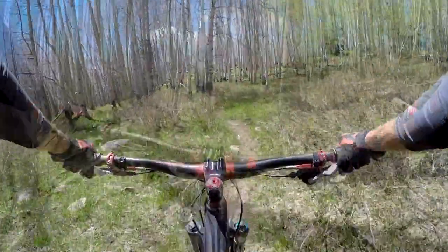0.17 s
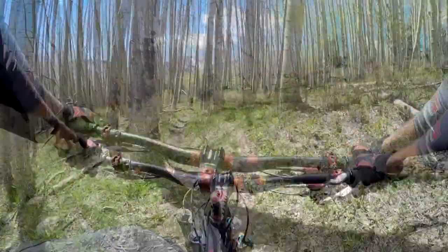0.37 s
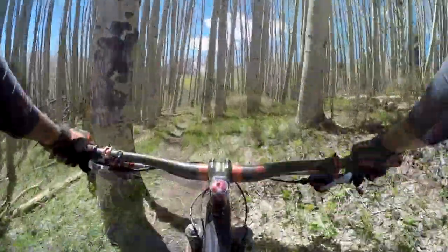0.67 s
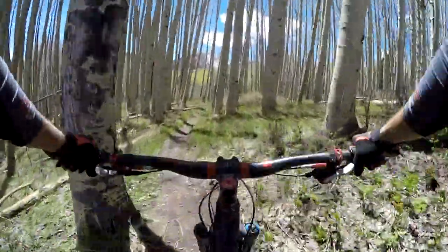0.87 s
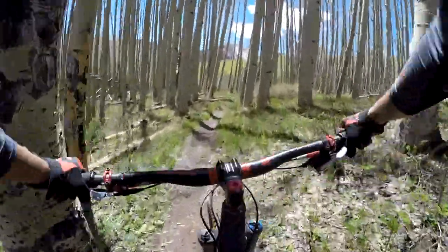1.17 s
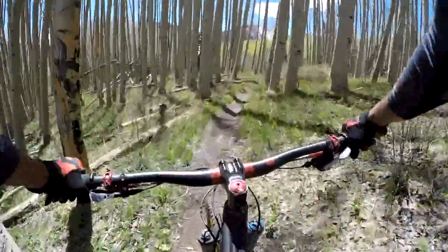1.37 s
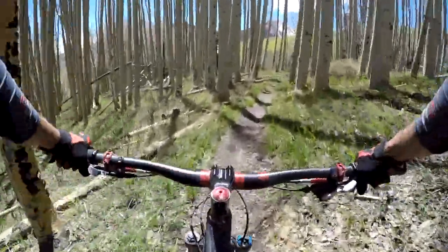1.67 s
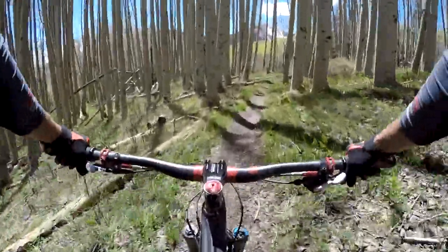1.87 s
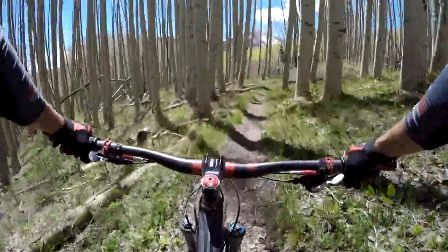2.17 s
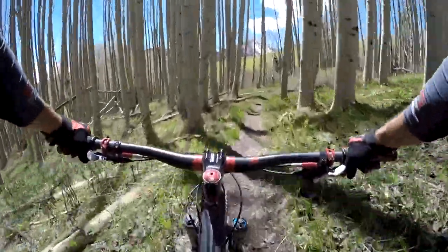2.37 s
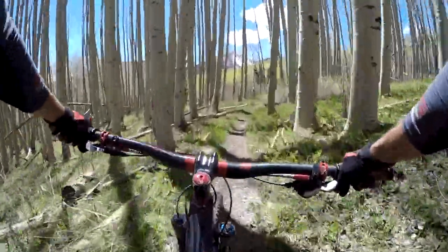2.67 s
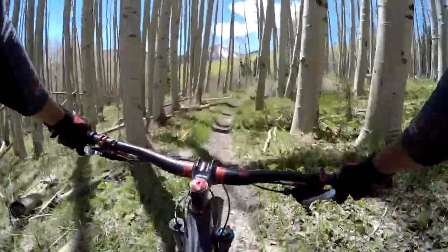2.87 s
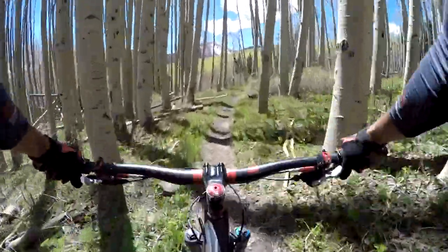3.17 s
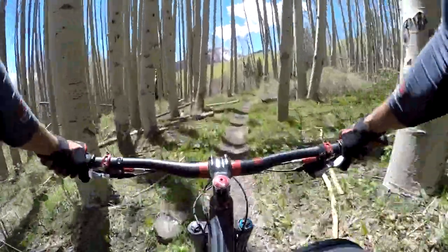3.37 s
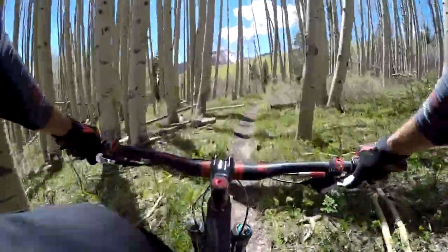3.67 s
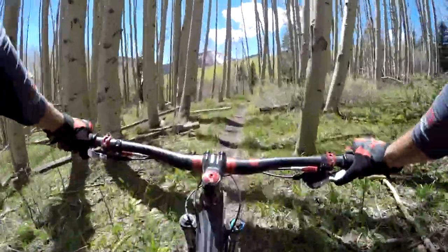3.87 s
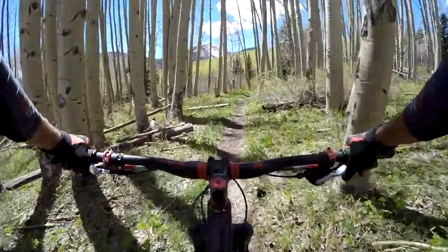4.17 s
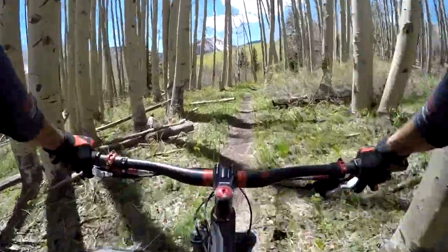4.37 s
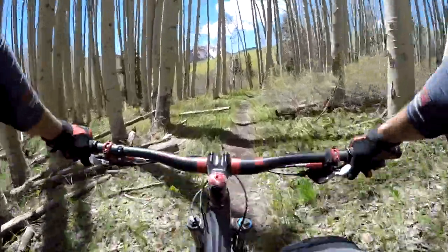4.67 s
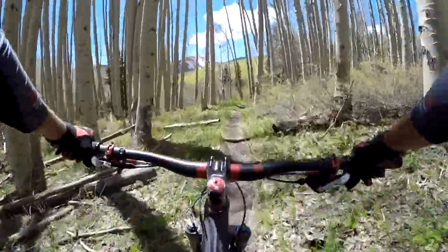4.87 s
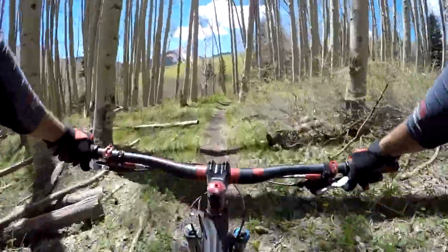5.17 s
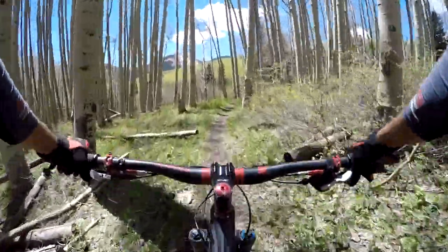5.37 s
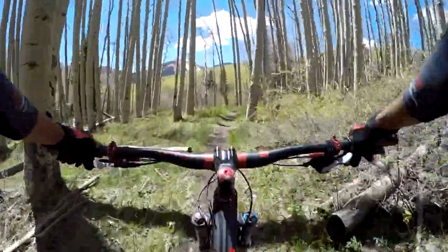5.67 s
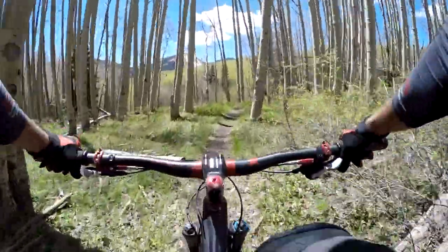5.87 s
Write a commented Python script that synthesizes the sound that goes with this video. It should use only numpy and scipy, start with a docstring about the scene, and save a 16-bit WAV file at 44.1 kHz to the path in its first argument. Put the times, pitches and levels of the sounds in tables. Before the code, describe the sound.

Close, chest-mounted microphone on a woodland bike ride. Constant deep wind buffets thump and flutter irregularly, far louder than the soft gritty crunch of tyres on dirt. Short dry clicks and rattles come in clusters, thickest just after one second and again near five, with one sharp tick around 3.6 seconds. A dull heartbeat thumps about three times a second beneath, almost hidden in the wind.

```python
"""On a dirt trail through woods, a camera strapped to a mountain biker's chest hears the ride.
Wind buffets its microphone: deep swinging thuds over filtered noise for rumble and eddies.
The heart thumps through the strap as damped swings, each with a snap of resonant noise.
Tyres crunch and scrape as grainy noise, and loose parts click as short, rough decaying tones.
Knocks and one pop stand out; the crunch and clicks are coloured by the camera's closed housing."""
import sys
import numpy as np
from scipy import signal
from scipy.fft import rfft, irfft, next_fast_len
from scipy.io import wavfile
from scipy.ndimage import uniform_filter1d

SR = 44100
rng = np.random.default_rng(int(sys.argv[2]) if len(sys.argv) > 2 else 0)


def dump(signal):
    """Clip the signal to [-1, 1] and save it as 16-bit WAV at the path in sys.argv[1]."""
    limited = np.clip(np.atleast_2d(signal).T, -1, 1)
    pcm = np.round(limited * 32767).astype(np.int16)
    wavfile.write(sys.argv[1], SR, pcm)


N = 265041  # length in samples
MS = 1e-3  # one millisecond in seconds
WHISTLE_HZ = 3880

# Spectrum of the crunching dirt. Each row: frequency in Hz, relative density in dB per Hz.
CRUNCH_SPECTRUM = [(500, -2), (1000, -3), (1730, 3.5), (1950, -3), (2180, -1.5), (2900, -3.5), (3600, -3),
                   (4100, -3.5), (5000, -13.5), (6200, -20)]
# Spectrum of the treble hiss. Each row: frequency in Hz, relative density in dB per Hz.
HISS_SPECTRUM = [(3500, -17), (4600, -2.5), (6500, -1.5), (8000, -7.5), (10000, -7.5), (12800, -12),
                 (14600, -14.5), (15600, -41)]
# Tones that loose crumbs of dirt ring with inside the housing.
# Each row: frequency in Hz, width in Hz, relative level in dB.
CRUMB_TONES = [(752, 460, -1), (984, 440, 0.5), (1317, 490, 0.5), (1750, 450, 0.5), (2233, 410, 3.5),
               (2627, 470, 0.5), (3253, 410, -2.5), (3866, 310, -3)]


def undb(db):
    """Decibels to gain."""
    return 10 ** (np.asarray(db) / 20)


def level(x, db):
    """Scale to an rms level in dB."""
    return x * undb(db) / np.sqrt(np.mean(x ** 2))


def follow(table):
    """Join (seconds, dB) points into a level in dB for every sample."""
    return np.interp(np.arange(N) / SR, *np.transpose(table))


def colour(x, shape):
    """Filter by (Hz, dB) points joined on a log-frequency axis, near silent outside them."""
    size = next_fast_len(len(x))
    hz, db = np.transpose(shape)
    f = np.maximum(np.arange(size // 2 + 1) * SR / size, 1)
    gain = undb(np.interp(np.log(f), np.log(hz), db, left=-120, right=-120))
    return irfft(rfft(x, size) * gain, size)[:len(x)]


def ring(x, hz, width_hz, count=1):
    """A resonance applied count times, gain 1 at its centre."""
    for _ in range(count):
        x = signal.lfilter(*signal.iirpeak(hz, hz / width_hz, fs=SR), x)
    return x


def walk(rate):
    """Random levels held 1 / rate s and slewed twice; spread near 1."""
    k = int(SR / rate)
    held = np.repeat(rng.standard_normal(N // k + 1), k)
    return 1.3 * uniform_filter1d(uniform_filter1d(held, k), k)[:N]


def add(out, s, x):
    """Mix x into out from time s."""
    i = max(int(s * SR), 0)
    out[i:i + len(x)] += x[:N - i]


def thuds(table, rise, fall):
    """Inward pushes with a swing before and after; rise and fall in cycles of the swing."""
    out = np.zeros(N)
    for s, db, hz in table:
        turns = np.arange(-3 * SR / hz, 4 * SR / hz) * hz / SR
        shape = np.exp(-(turns / np.where(turns < 0, rise, fall)) ** 2)
        add(out, s + turns[0] / hz, -undb(db) * shape * np.cos(2 * np.pi * turns))
    return out


def gritty(rate, scatter_db, share):
    """Noise with a share of sparse grains, rate per second, of very uneven but bounded size."""
    chance = rng.random((3, N))
    size = np.minimum(-np.log(1 - chance[2]), 4)
    grains = (chance[0] < rate / SR) * np.sign(chance[1] - .5) * undb(scatter_db * size)
    return level(rng.standard_normal(N), 0) + share * level(grains, 0)


def crumbs(rate, scatter_db, share, flicker_db):
    """One resonant stream of grains for each crumb tone, each flickering alone."""
    streams = []
    for hz, width_hz, db in CRUMB_TONES:
        stream = ring(gritty(rate, scatter_db, share), hz, width_hz, count=2)
        streams.append(level(stream, db) * undb(flicker_db * walk(40)))
    return np.array(streams)


def rolling():
    """Tyres on dirt and air past the housing; the bands flicker partly together."""
    # Each row: time in seconds, then the levels before flicker of the tyre crunch in dB
    # and the housing whistle in dB.
    roll_levels = [(0.0, -63.5, -73), (0.3, -59.5, -64.5), (0.6, -61, -77), (0.95, -63.5, -76),
                   (1.08, -63.5, -84), (1.12, -60, -87), (1.5, -58, -83), (1.8, -60, -77),
                   (2.45, -62.5, -79.5), (2.79, -59, -81), (3.05, -62, -76), (3.4, -60.5, -78),
                   (3.64, -60.5, -61), (3.88, -60.5, -71.5), (4.0, -58.5, -60), (4.15, -59.5, -71),
                   (4.62, -61.5, -66.5), (4.84, -57.5, -69), (4.95, -56.5, -59.5), (5.05, -59, -70),
                   (5.3, -62.5, -61.5), (5.42, -57, -72), (5.55, -59.5, -57.5), (5.66, -58.5, -73),
                   (5.76, -57, -62), (5.95, -57.5, -60.5), (6.01, -57, -80)]
    # Level of the low rush before flicker. Each row: time in seconds, level in dB.
    rush_levels = [(0.0, -64.5), (0.33, -64.5), (0.6, -63.5), (1.61, -66), (1.96, -63.5), (2.38, -65),
                   (3.31, -66), (3.41, -64.5), (3.88, -63.5), (4.32, -61), (4.6, -65), (5.31, -64.5),
                   (5.46, -66.5), (6.01, -66.5)]
    # Level of the treble hiss before flicker. Each row: time in seconds, level in dB.
    hiss_levels = [(0.0, -68.5), (0.28, -67.5), (0.9, -69), (1.57, -68), (2.41, -69.5), (3.08, -69.5),
                   (3.67, -66.5), (3.78, -67.5), (4.38, -67.5), (4.69, -67), (5.42, -66.5), (5.54, -66),
                   (6.01, -66.5)]
    # Spectrum of the low rush. Each row: frequency in Hz, relative density in dB per Hz.
    rush_spectrum = [(120, -21), (200, -3), (340, -1.5), (470, -3), (525, -1.5), (580, -6), (800, -11),
                     (1200, -31)]
    s, *columns = np.transpose(roll_levels)
    crunch_db, whistle_db = (np.interp(np.arange(N) / SR, s, c) for c in columns)
    bumps = np.tanh(walk(22.246))  # flicker that all bands share

    # big crumbs crack low, small ones high
    coarse = ring(gritty(rate=500, scatter_db=5.5, share=0.66), hz=1190, width_hz=4600)
    fine = ring(gritty(rate=760, scatter_db=7.0, share=0.28), hz=2460, width_hz=2350)
    grit = coarse * undb(0.39 * walk(35)) + fine * undb(0.71 * walk(45))
    loose = crumbs(rate=120, scatter_db=5.5, share=0.51, flicker_db=1.24).sum(axis=0)
    crunch = level(colour(grit, CRUNCH_SPECTRUM), -2.63) + level(loose, -3)
    crunch = crunch * undb(crunch_db + 1.3 * bumps)

    # the grit also excites a narrow whistle with a weaker resonance on each side
    whistle = ring(fine, WHISTLE_HZ, width_hz=330, count=2)
    whistle = whistle + undb(-12.0) * ring(coarse, hz=3480, width_hz=910, count=2)
    whistle = whistle + undb(-13.5) * ring(coarse, hz=4650, width_hz=1700, count=2)
    whistle = level(whistle, 0) * undb(whistle_db + 1.6 * bumps)

    hiss = level(colour(gritty(rate=1300, scatter_db=3.0, share=0.55), HISS_SPECTRUM), 0)
    hiss = hiss * undb(follow(hiss_levels) + 1.2 * bumps + 0.95 * walk(30))
    rush = level(colour(gritty(rate=230, scatter_db=4.5, share=0.21), rush_spectrum), 0)
    rush = rush * undb(follow(rush_levels) + 3.2 * bumps + 1.54 * walk(23.89))
    return crunch + whistle + hiss + rush


def scrapes():
    """Tyre and undergrowth: short swells of crackling crumbs with a little swish on top."""
    # Each row: middle in seconds, level before the swell in dB, half length in ms, centre in Hz.
    scrape_rows = [(0.815, -55, 17, 2200), (1.15, -59, 70, 2300), (1.205, -51, 58, 1590),
                   (1.25, -59.5, 30, 1300), (1.301, -55, 36, 2600), (1.34, -56, 40, 1600),
                   (1.41, -55, 55, 1700), (1.48, -59.5, 60, 1300), (1.532, -54, 23, 1800),
                   (1.69, -52.5, 56, 1700), (1.735, -55, 25, 2200), (1.97, -51.5, 45, 1600),
                   (2.04, -58, 80, 1900), (2.15, -53.5, 31, 1290), (3.302, -54.5, 22, 2000),
                   (3.385, -57, 56, 2010), (3.681, -55.5, 230, 2510), (3.995, -58.5, 92, 2600),
                   (4.201, -56, 34, 2500), (4.364, -54.5, 34, 2200), (4.735, -55, 115, 1900),
                   (4.82, -57, 58, 2100), (5.283, -59, 79, 2200), (5.494, -61, 20, 1600),
                   (5.752, -61, 70, 2200), (5.881, -54, 14, 2200), (5.955, -52, 51, 2110)]
    spread_octaves = 2.1  # how far a scrape reaches around its centre
    out = np.zeros(N)
    grit = crumbs(rate=200, scatter_db=5.5, share=0.9, flicker_db=3.0)
    swish = level(colour(rng.standard_normal(N), HISS_SPECTRUM), -18)
    tones_hz = np.array(CRUMB_TONES)[:, 0]
    for s, db, ms, hz in scrape_rows:
        half = int(ms * MS * SR)
        span = slice(int(s * SR) - half, int(s * SR) + half)
        weight = np.exp(-(np.log2(tones_hz / hz) / spread_octaves) ** 2)
        piece = level(weight @ grit[:, span], 0) + swish[span]
        swell = np.hanning(2 * half)[:len(piece)] ** 2.0
        add(out, s - half / SR, undb(db) * swell * piece)
    return out


def ticks(count):
    """Faint clicks at chance moments, as rows like those of the clear ones."""
    middle_db, scatter_db, ring_db = -52, 3., -12
    low_hz, high_hz, length_ms = 1100, 2470, 3.5
    rows = []
    for a, b, c in rng.random((count, 3)):
        db = middle_db + scatter_db * (2 * b - 1)
        hz = low_hz + c * (high_hz - low_hz)
        rows.append((a * N / SR, db, hz, WHISTLE_HZ, ring_db, ring_db, length_ms))
    return rows


def rough_tone(t, noise, hz, pitched, rough_db, rough_width):
    """A clean tone roughened by noise at its pitch; the width is a share of the pitch."""
    rough = level(ring(noise, hz, rough_width * hz, count=2), rough_db)
    return pitched * np.sin(2 * np.pi * hz * t) + rough


def clicks():
    """Cables, chain and pebbles: a crack, damped rough tones, the housing's ring, a trace of hiss."""
    # Each row: start in seconds, level in dB, pitch in Hz, second pitch in Hz, its level over
    # the first in dB, ring of the housing in relative dB, decay time in ms.
    clear_clicks = [(0.392, -42, 1840, 1030, -6, -7, 5.1), (0.467, -42.5, 1680, 2220, -14, -19, 5.4),
                    (0.711, -48, 1520, 730, -8, -10, 2.6), (0.903, -48, 895, 1360, -3.5, -3.5, 5.5),
                    (1.05, -40.5, 955, 2220, -22, -30, 4.2), (1.068, -37, 1510, 3120, 2.5, -9, 5.4),
                    (1.072, -40, 980, 1850, 2, -12, 3.1), (1.079, -38, 1000, 1790, 0.5, -5, 4.2),
                    (1.214, -43, 1010, 2156, 0, -28, 9.8), (1.395, -45, 2220, 2820, -6, -18, 2.8),
                    (1.416, -46, 1260, 2350, -4, -19, 4.4), (1.56, -48.5, 880, 3780, 1, -5, 3.9),
                    (1.694, -47, 910, 2540, 4, -12, 4.5), (1.712, -45, 2150, 3850, -3, -18, 4.4),
                    (1.897, -49.5, 2100, 3820, 4, -2.5, 4.1), (1.944, -48, 1440, 2430, 1, -13, 2.7),
                    (1.957, -41.5, 1250, 1790, -6, -23, 4.8), (2.019, -48, 1660, 2280, -6, -16, 3),
                    (2.577, -54, 1740, 3880, 3, -3, 4.4), (2.646, -51, 1330, 2600, -6, -4, 4.1),
                    (2.676, -51.5, 1240, 1720, -1, -14, 3.3), (2.755, -47, 1230, 1830, -3, -4, 6.7),
                    (2.842, -52, 2160, 3900, 4, -4, 5.6), (2.878, -47.5, 1780, 1290, -3, -18, 4.6),
                    (2.896, -42.5, 1260, 2520, -4, -14, 5.3), (3.622, -47, 1260, 3900, 2, -6, 4),
                    (3.635, -26.5, 1430, 3610, -12, -13, 2.7), (3.641, -46, 3300, 2500, -2, -12, 2.6),
                    (3.739, -39.5, 1670, 3500, -7, -19, 3.5), (3.792, -39, 1600, 3720, -8, -12, 3.2),
                    (4.036, -58, 3830, 2920, -8, 2, 3.4), (4.199, -57, 1830, 2400, -5, 2, 5.7),
                    (4.635, -34, 1720, 2500, -12, -16, 4.5), (4.716, -44, 2200, 1550, -3, -8, 5.2),
                    (4.757, -46, 1720, 1160, 0, -10, 3.7), (4.792, -47, 2350, 1260, -3, -17, 6.4),
                    (4.864, -35.5, 1530, 3900, -7, -22, 2.6), (4.872, -41, 1750, 2190, -7, -21, 4.4),
                    (4.922, -35.5, 1730, 2680, -10, -12.5, 4.4), (4.976, -44, 1680, 3750, -12, -7, 5.6),
                    (5.285, -43, 1030, 1600, -3, -10, 3.8), (5.494, -46, 1200, 1770, 0, -12, 4.5),
                    (5.589, -45, 1640, 2300, -3, -11, 4.8), (5.659, -49, 1090, 1560, -1, -16, 4),
                    (5.698, -44.5, 1450, 3660, -6, -8, 3.3), (5.716, -46, 2270, 3760, -6, -17, 4),
                    (5.85, -40, 750, 1140, -2, -19, 2.5)]
    # What the housing rings with at each click. Each row: frequency in Hz, relative level in dB.
    housing_tones = [(2400, -4.5), (3150, -6), (3850, -26)]
    air_db, snap_db = -9.5, -1  # hiss and broad crack, over the ring of the housing
    snap_ms, onset_ms = 1.08, .7
    out, t = np.zeros(N), np.arange(int(.04 * SR)) / SR
    # the housing wall holds back the top
    wall = signal.butter(6, 4150, fs=SR, output="sos")
    table = clear_clicks + ticks(count=14)
    noises = rng.standard_normal((len(table), len(t)))
    for (s, db, hz, second_hz, second_db, ring_db, ms), noise in zip(table, noises):
        blow = (1 - np.exp(-(t / (onset_ms * MS)) ** 2)) * np.exp(-(t / (ms * MS)) ** 1.5)
        own = sum(undb(d) * rough_tone(t, noise, f, pitched=0.8, rough_db=-11, rough_width=0.55)
                  for f, d in ((hz, 0), (second_hz, second_db)))
        housing = sum(undb(d) * rough_tone(t, noise, f, pitched=0.74, rough_db=-0.5, rough_width=0.51)
                      for f, d in housing_tones)
        body = blow * (own + undb(ring_db) * housing)
        air = blow * level(colour(noise, HISS_SPECTRUM), ring_db + air_db)
        snap = level(colour(noise, CRUNCH_SPECTRUM), ring_db + snap_db)
        snap = np.exp(-(t / (snap_ms * MS) - 1) ** 2) * snap
        muffled = signal.sosfilt(wall, body) + signal.sosfilt(wall, snap)
        add(out, s, undb(db) * (muffled + air))
    return out


def pop():
    """One sharp pop: the waveform dips ever faster, then jumps back to zero."""
    end_s, peak_db, dip_ms = .4144, -27, .8
    out, t = np.zeros(N), np.arange(-.01, 0, 1 / SR)
    add(out, end_s + t[0], -undb(peak_db) * np.exp(t / (dip_ms * MS)))
    return uniform_filter1d(out, size=2)  # the jump is smoothed over two samples


def knocks():
    """Small knocks carried up the frame and strap: an abrupt push, then a damped swing."""
    # Each row: deepest push in seconds, peak in dB.
    knock_rows = [(0.07, -36), (0.371, -32), (0.41, -35), (1.231, -30), (1.383, -39), (1.683, -32.5),
                  (1.968, -46), (4.201, -36), (4.887, -38), (5.222, -34), (5.65, -35.5)]
    swing_hz = 84
    return thuds([(s, db, swing_hz) for s, db in knock_rows], rise=0.18, fall=0.94)


def heart():
    """Each beat is a short, higher snap of the valves that runs into a dull thump."""
    # Each row: deepest push in seconds, peak of the thump in dB, thump in Hz.
    beats = [(0.511, -23, 73.5), (0.85, -23.5, 54.5), (1.149, -25, 76), (1.467, -27, 69.4),
             (1.814, -19, 60.4), (2.128, -21.5, 71.6), (2.448, -25, 54.4), (2.768, -26.5, 78),
             (3.103, -25.5, 71), (3.441, -23, 57), (3.773, -27, 58.5), (4.099, -18.5, 63),
             (4.429, -30.5, 62), (4.748, -28, 54.6), (5.079, -22, 72), (5.392, -23, 57.5),
             (5.74, -22.5, 72.4)]
    valve_db, valve_ms, lead_ms = -21.5, 27, 12.3  # level over the thump, width, lead ahead of it
    t = np.arange(N) / SR + lead_ms * MS
    snap = sum(undb(db + valve_db) * np.exp(-((t - s) / (valve_ms * MS)) ** 2) for s, db, _ in beats)
    valves = ring(rng.standard_normal(N), hz=124.8, width_hz=79, count=4)
    return thuds(beats, rise=0.71, fall=0.88) + snap * level(valves, 0)


def wind():
    """Single buffets push the microphone over a fluttering rumble and quicker eddies."""
    # Buffets, strong and weak. Each row: deepest push in seconds, peak in dB, swing in Hz.
    buffets = [(0.043, -28, 14.7), (0.121, -15, 24.8), (0.218, -17.5, 14.2), (0.261, -12, 20.4),
               (0.374, -15.5, 17.1), (0.457, -9, 20.2), (0.512, -11.5, 28.3), (0.574, -17.5, 25),
               (0.641, -10, 19), (0.74, -17.5, 17.5), (0.789, -22.5, 22), (0.837, -13.5, 25.4),
               (0.878, -9, 23.6), (0.987, -20, 23.5), (1.063, -12, 18.7), (1.199, -18.5, 27),
               (1.346, -6.5, 21.3), (1.488, -11, 31.4), (1.555, -15, 19), (1.638, -14, 18),
               (1.764, -16, 19), (1.853, -16.5, 29), (1.985, -9.5, 26), (2.035, -9, 21.7), (2.081, -12, 25),
               (2.164, -6.5, 24.8), (2.21, -23, 25), (2.337, -13, 22.6), (2.466, -13.5, 23.7),
               (2.504, -23, 23), (2.728, -17.5, 19.4), (2.791, -9.5, 28.8), (2.936, -17.5, 15.8),
               (3.03, -20.5, 17.5), (3.149, -11, 21.2), (3.207, -18.5, 19), (3.317, -22, 32),
               (3.389, -12, 16.6), (3.443, -11, 25.8), (3.641, -13, 22), (3.692, -12, 22),
               (3.771, -8, 32.5), (3.899, -12, 16.6), (3.943, -23, 11.4), (4.004, -9, 18.6),
               (4.052, -12, 28), (4.127, -8.5, 23), (4.219, -11.5, 19.7), (4.275, -14.5, 21.5),
               (4.372, -9, 20.4), (4.424, -10.5, 26.8), (4.464, -20, 19), (4.533, -18.5, 24),
               (4.594, -14, 21.7), (4.652, -21.5, 23.4), (4.748, -6.5, 23.3), (4.823, -13, 18),
               (4.889, -12, 22.3), (5.008, -13.5, 21.5), (5.047, -32, 18), (5.082, -9, 25.8),
               (5.111, -13, 14.7), (5.152, -12, 22.4), (5.205, -21, 24), (5.242, -18, 32), (5.316, -15, 24),
               (5.401, -15.5, 13), (5.459, -13.5, 17), (5.55, -25.5, 32), (5.737, -7, 34.7),
               (5.767, -18, 28), (5.816, -12, 21), (5.965, -19.5, 19)]
    # Spectrum of the rumble. Each row: frequency in Hz, relative density in dB per Hz.
    rumble_spectrum = [(6, 2.5), (12, -7), (22, -9.5), (35, -5.5), (50, -17.5), (70, -21.5), (100, -85)]
    # Spectrum of the eddies. Each row: frequency in Hz, relative density in dB per Hz.
    eddy_spectrum = [(40, -44), (60, -8), (90, -5.5), (130, -11.5), (170, -15.5), (220, -22.5), (300, -31)]
    # Level of the eddies around their flicker. Each row: time in seconds, level in dB.
    eddy_levels = [(0.0, -63), (0.12, -52), (0.38, -52.5), (0.89, -51), (1.31, -52), (1.5, -51),
                   (1.75, -51.5), (2.15, -47.5), (2.3, -56), (2.56, -54), (3.4, -52), (4.1, -50.5),
                   (4.4, -49.5), (4.55, -54), (4.95, -54), (5.2, -51), (6.01, -51)]
    rumble_db, flutter_db = -28.5, 2.  # level before flutter, and its depth
    rumble = level(colour(rng.standard_normal(N), rumble_spectrum), 0)
    eddies = colour(rng.standard_normal(N), eddy_spectrum)
    eddies = level(eddies * undb(5.3 * np.tanh(walk(25.11)) + 0.79 * walk(7.4)), 0)
    eddies = eddies * undb(follow(eddy_levels))
    rumble = rumble * undb(rumble_db + flutter_db * np.tanh(walk(14)))
    return thuds(buffets, rise=0.62, fall=0.75) + rumble + eddies


def scene():
    """All sources reach one microphone."""
    return (rolling() + scrapes() + clicks() + pop() + knocks() + heart() + wind())[None]


def record(dry):
    """The camera cuts the top, steeply above 15.7 kHz."""
    return signal.sosfilt(signal.ellip(10, .2, 80, 15700, fs=SR, output="sos"), dry)


dry = scene()
out = record(dry)
dump(out)
```